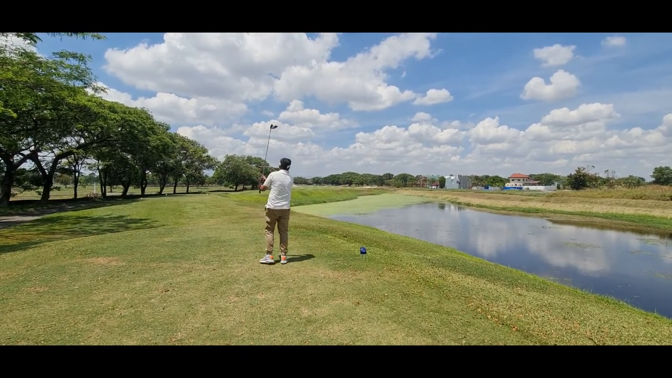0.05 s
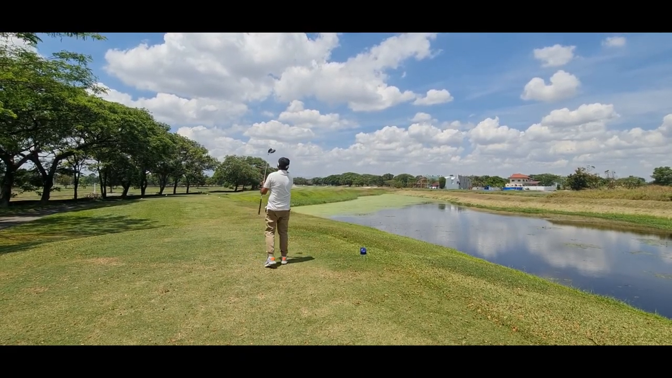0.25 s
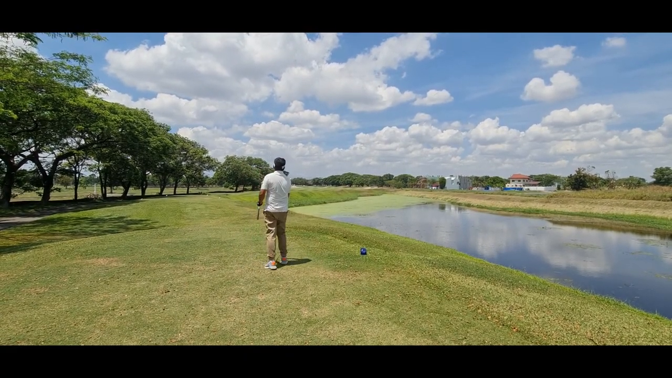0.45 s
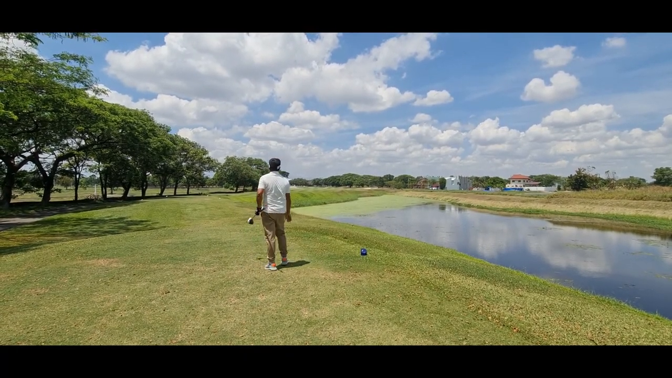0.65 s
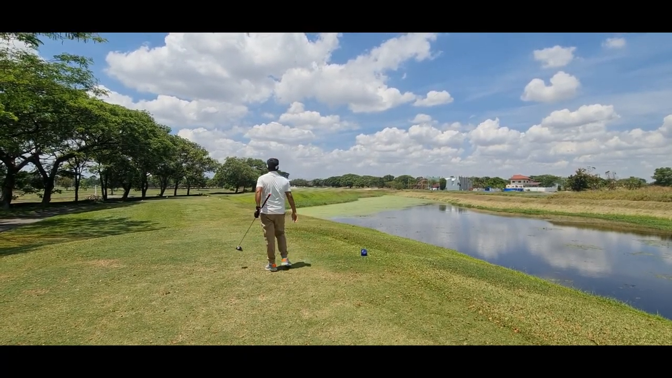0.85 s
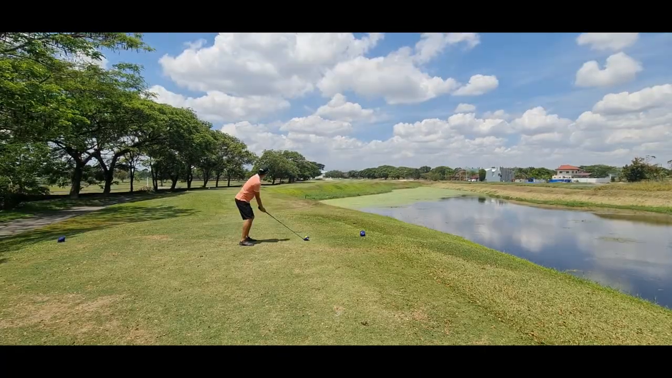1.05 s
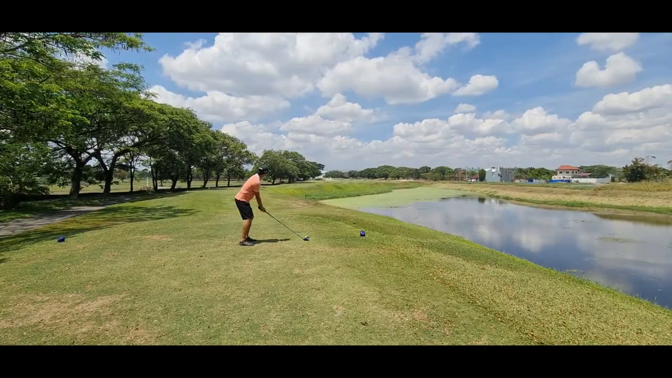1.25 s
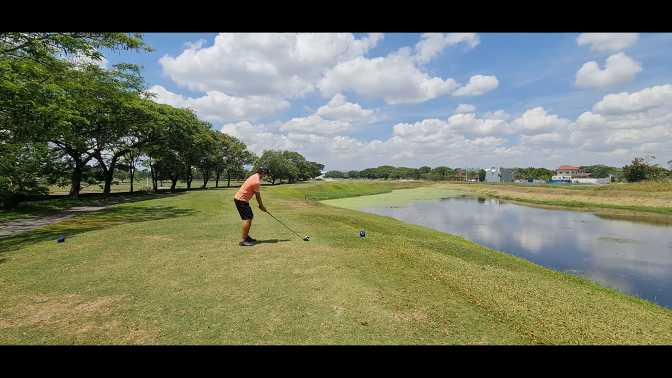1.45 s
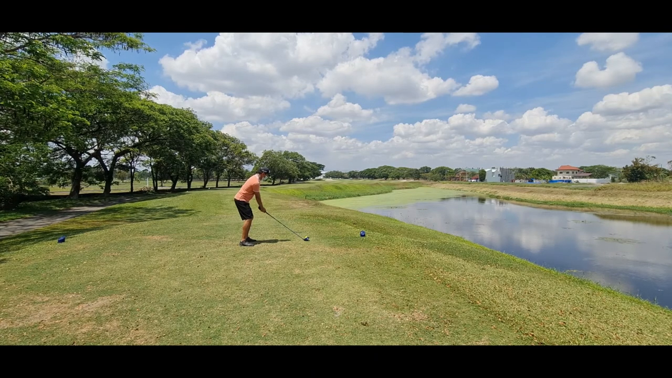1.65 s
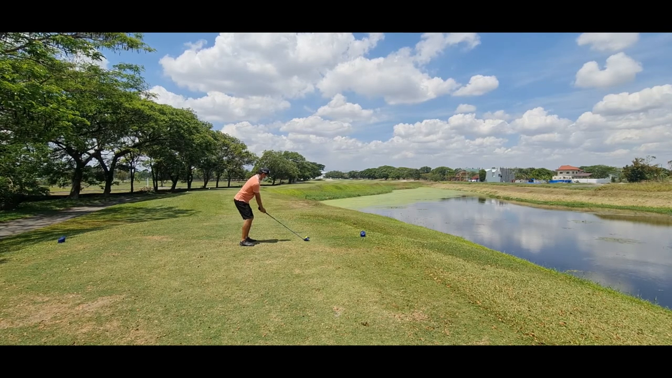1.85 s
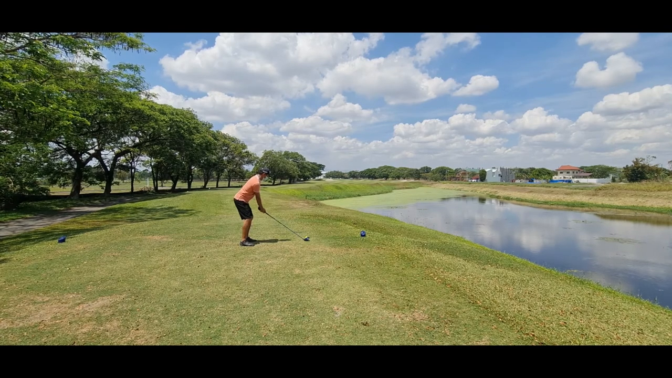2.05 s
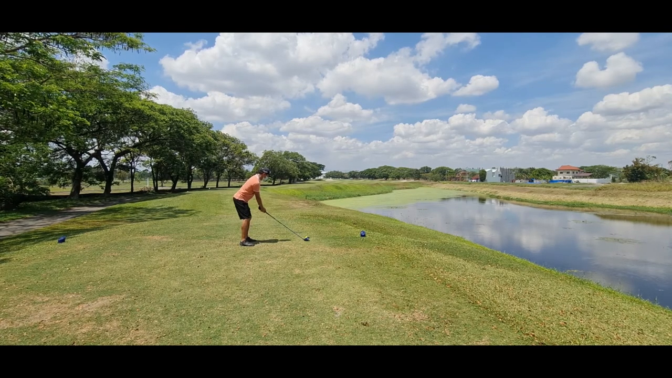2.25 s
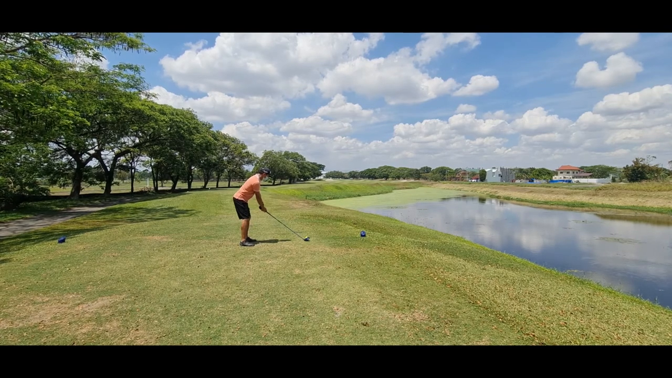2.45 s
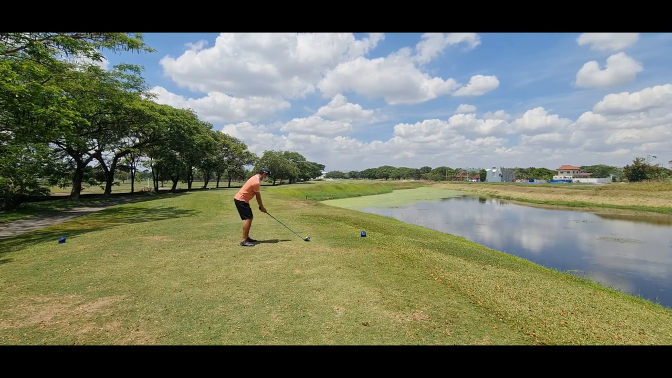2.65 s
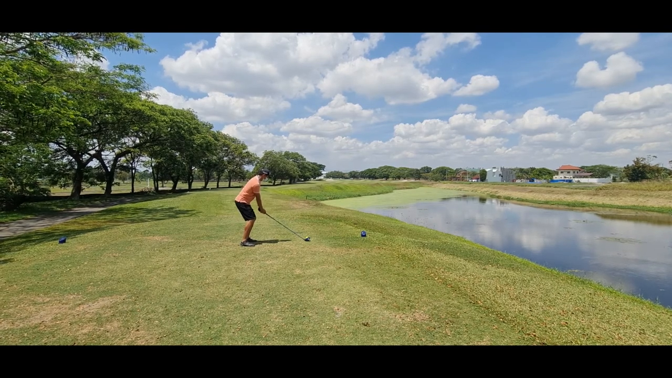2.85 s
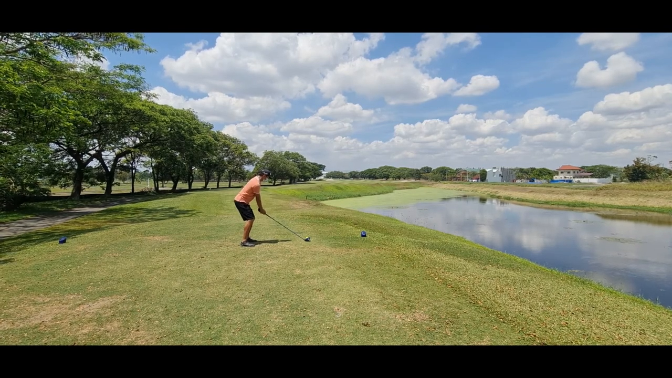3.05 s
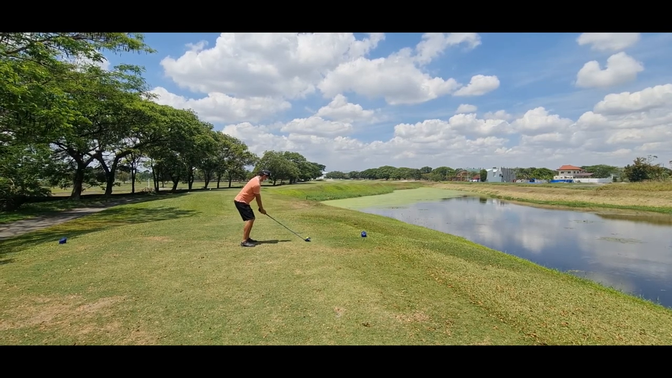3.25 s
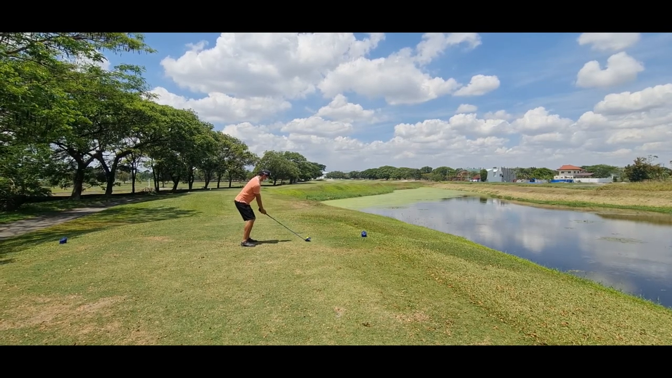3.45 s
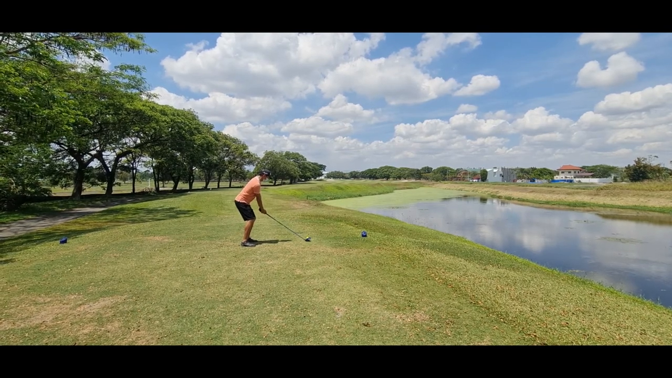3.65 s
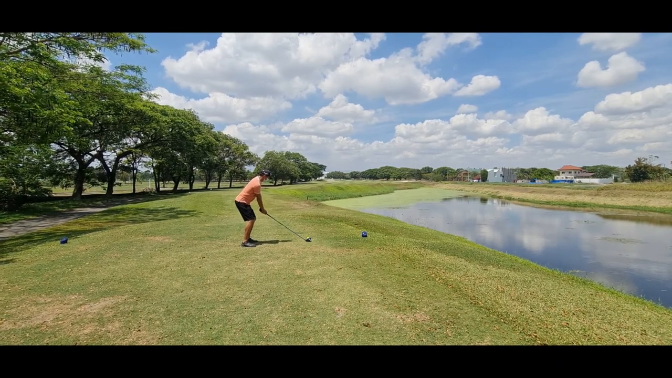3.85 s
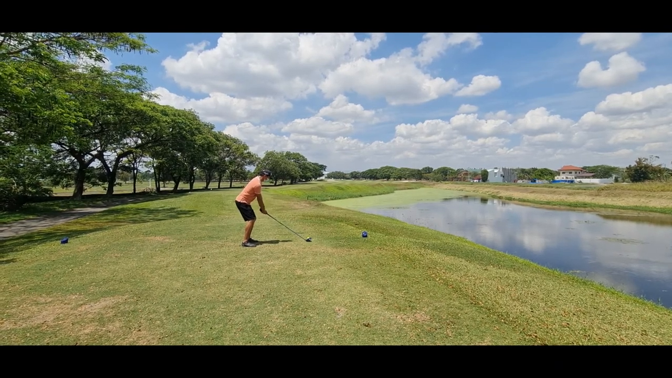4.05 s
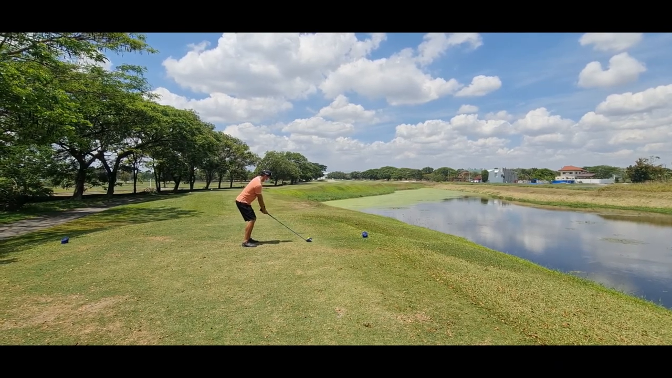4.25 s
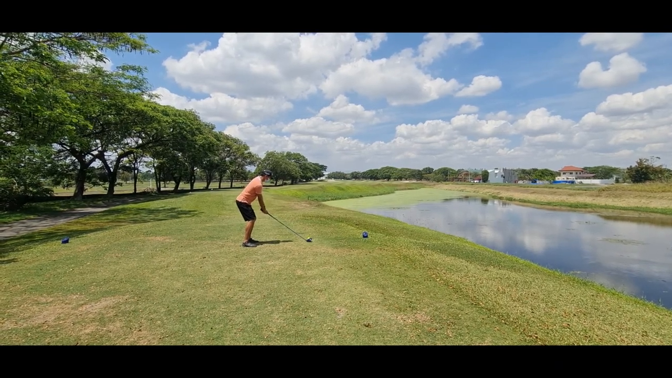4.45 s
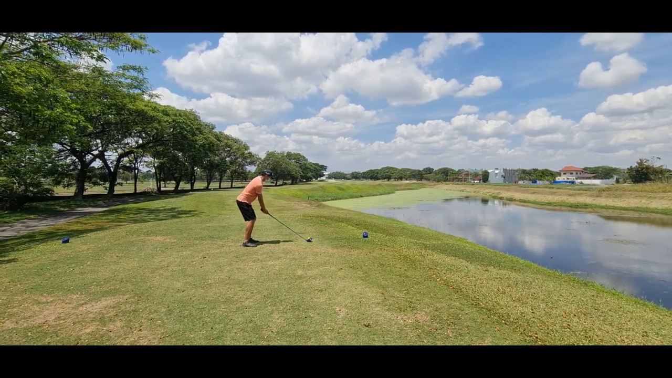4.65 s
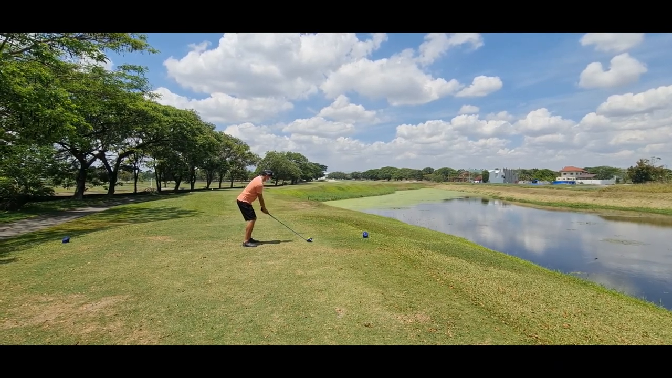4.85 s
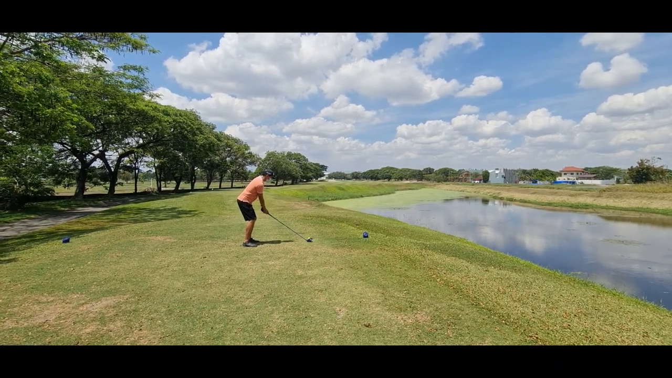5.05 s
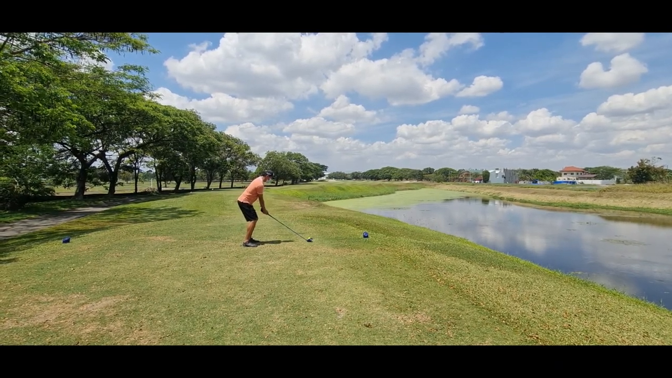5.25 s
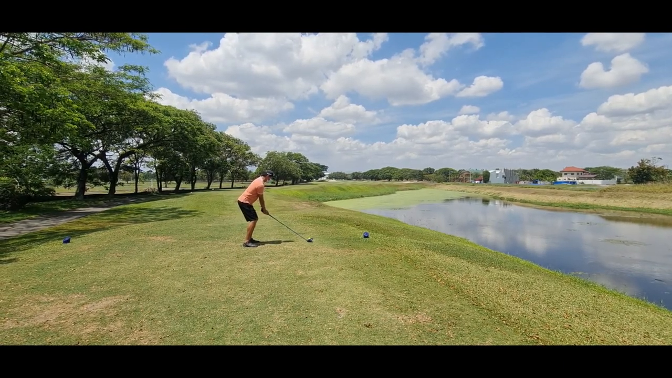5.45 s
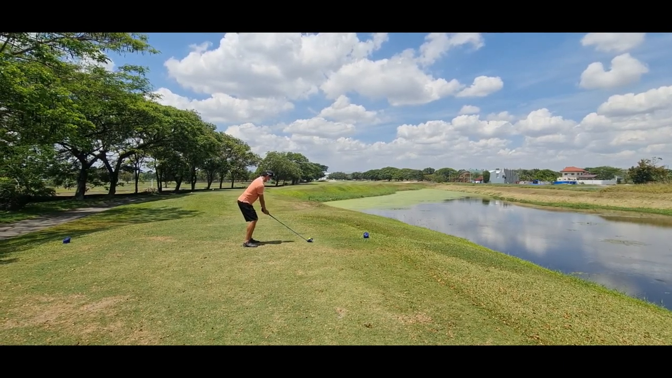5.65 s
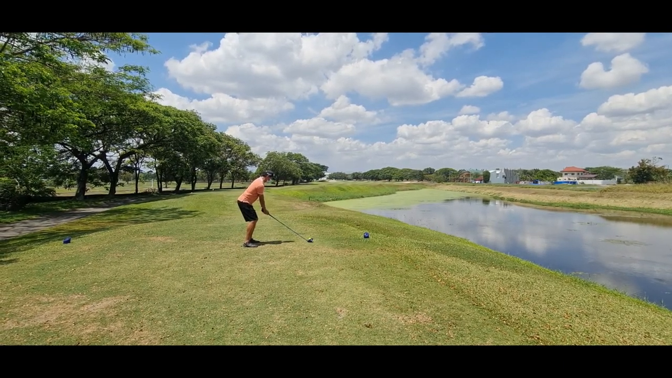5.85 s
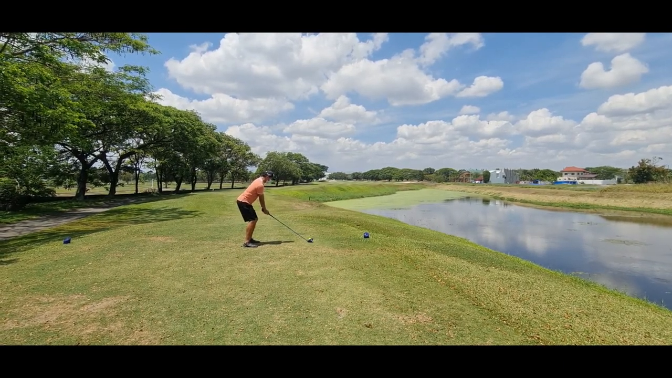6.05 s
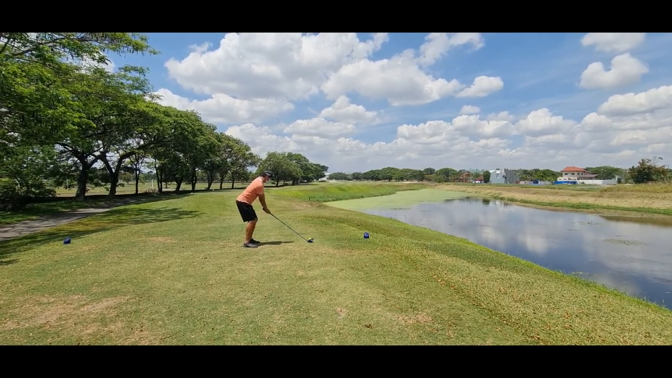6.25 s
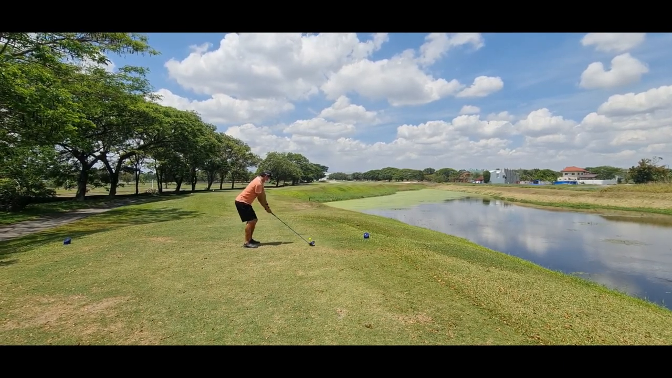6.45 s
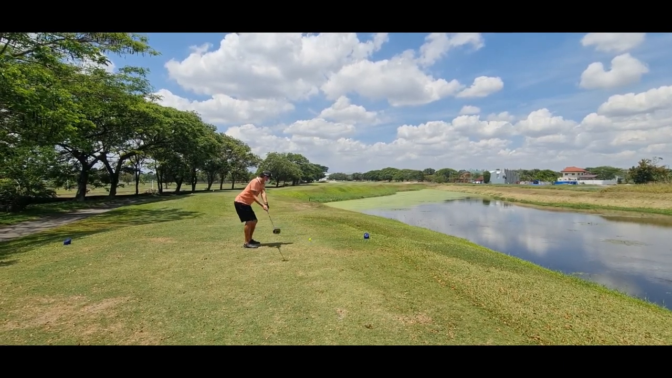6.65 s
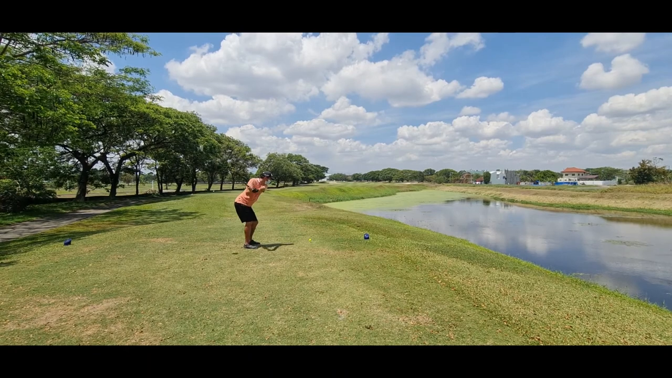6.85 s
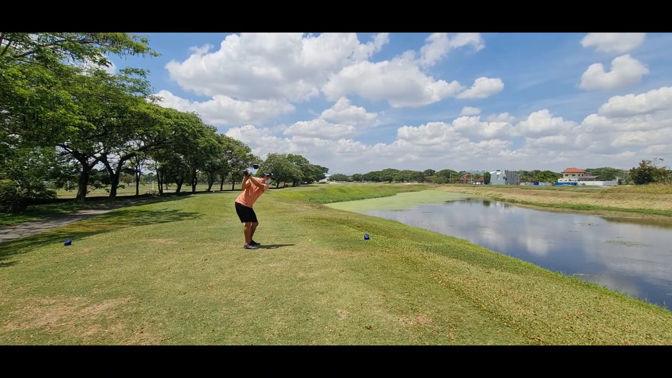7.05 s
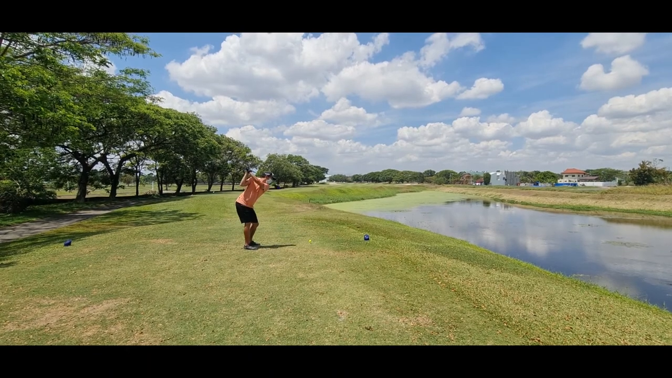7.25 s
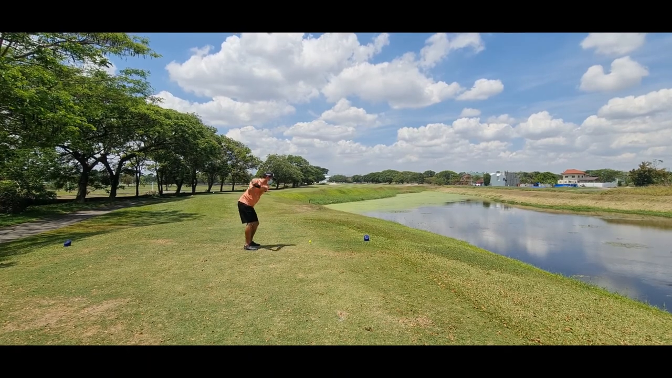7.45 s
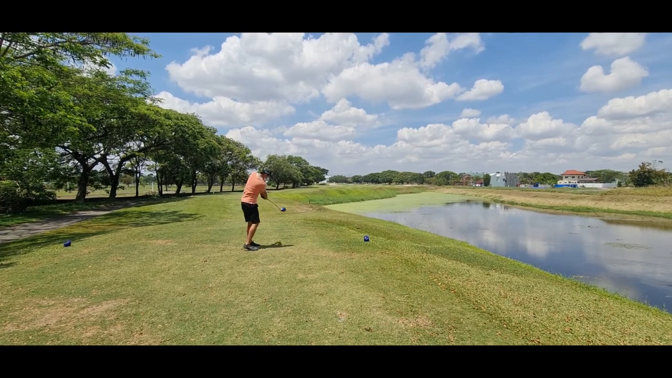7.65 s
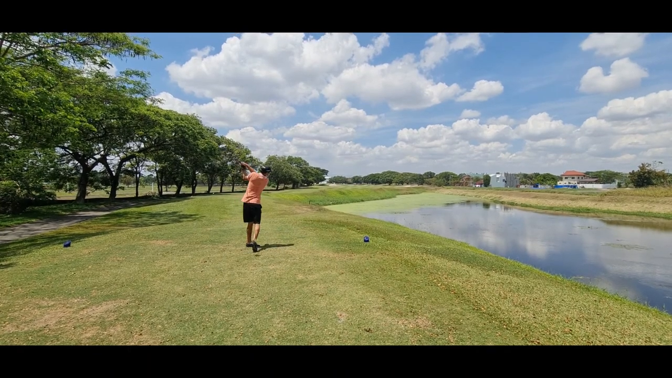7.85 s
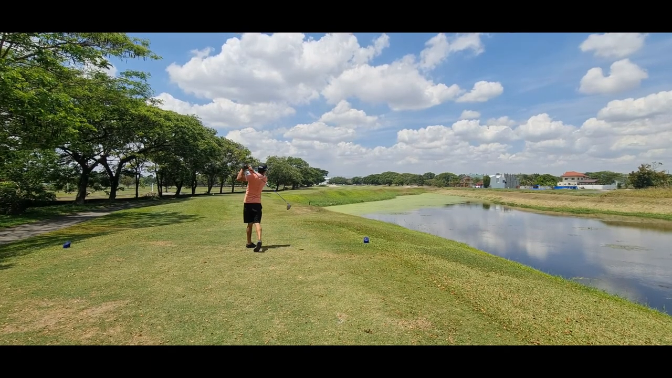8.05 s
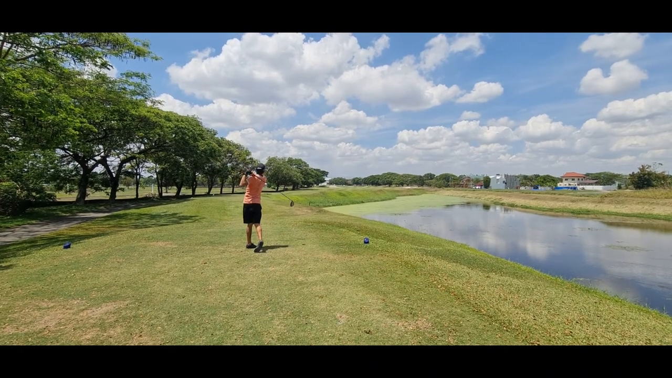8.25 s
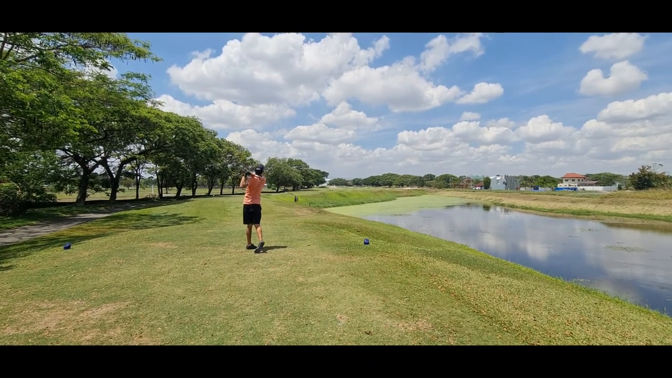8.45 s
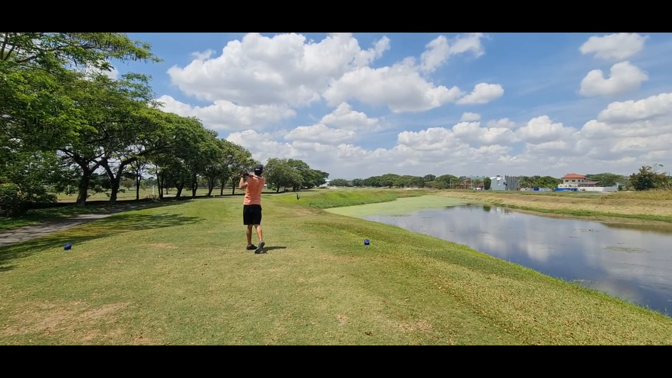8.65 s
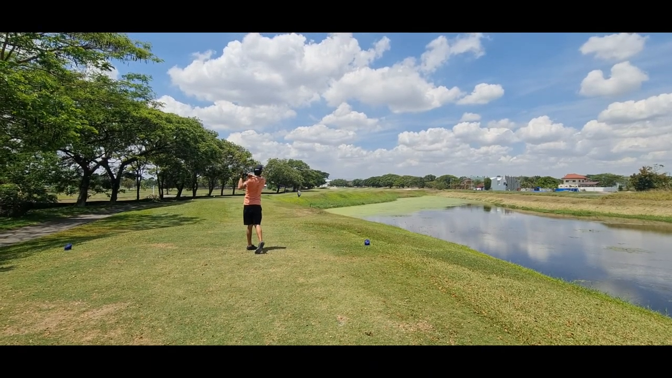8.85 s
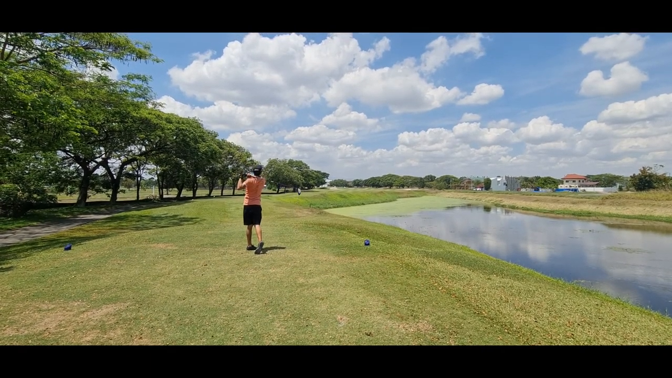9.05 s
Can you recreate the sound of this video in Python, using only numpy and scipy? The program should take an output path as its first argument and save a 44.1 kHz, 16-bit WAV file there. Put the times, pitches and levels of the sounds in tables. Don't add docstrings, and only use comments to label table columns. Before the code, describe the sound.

Outdoors on a golf tee by water and trees, wind thumps softly at the microphone while small birds chirp, whistle and scratch. The sound drops out briefly near one second, then a dry twig snaps. Late on, a fast swish leads into a very loud, sharp driver strike with a short hollow metallic ring; the tree line scatters it back, then wind and birds remain.

```python
import sys
import numpy as np
from scipy import signal
from scipy.fft import rfft, irfft, next_fast_len
from scipy.io import wavfile
from scipy.ndimage import uniform_filter1d, map_coordinates

SR = 44100
rng = np.random.default_rng(int(sys.argv[2]) if len(sys.argv) > 2 else 0)


def output_pcm(signal):
    pcm = np.clip(np.atleast_2d(signal).T, -1, 1) * 32767
    wavfile.write(sys.argv[1], SR, np.round(pcm).astype(np.int16))


def level_to_linear(level):
    exponent = np.asarray(level, float) / 20
    return 10 ** exponent


N = 401310
T = np.arange(N) / SR
BLOW_S = 7.75385
CUT_S = .907, 1.009
# (frequency [Hz], left-right correlation)
ALIKE = [(300, 0.15), (700, -0.6), (1400, -0.56), (2000, -0.27), (3000, 0.61), (8000, 0.044)]


def unit(x):
    return x / np.sqrt(np.mean(x ** 2) + 1e-20)


def along(points, hz):
    f, v = np.transpose(points)
    return np.interp(np.log(hz + 1), np.log(f + 1), v)


def curves(rows):
    s, *cols = np.transpose(rows)
    return [np.interp(T, s, c) for c in cols]


def wobble(rate_hz):
    return map_coordinates(rng.standard_normal(int(N * rate_hz / SR) + 4), [T * rate_hz])


def filtered(x, response):
    m = next_fast_len(x.shape[-1] + 8192)
    return irfft(rfft(x, m) * response(np.fft.rfftfreq(m, 1 / SR)), m)[..., :x.shape[-1]]


def rush(spectrum, alike):
    def shape(hz):
        turn = np.arccos(np.clip(along(alike, hz), -1, 1)) / 2
        return level_to_linear(along(spectrum, hz)) * [np.cos(turn), np.sin(turn)]

    mid, side = filtered(rng.standard_normal((2, N)), shape)
    return unit(np.array([mid + side, mid - side]))


def patchy(x, depth_db):
    z = signal.stft(x, nperseg=1024)[2]
    field = uniform_filter1d(rng.standard_normal(z.shape), size=7, axis=1)
    field = uniform_filter1d(field, size=4, axis=2)
    return unit(signal.istft(z * level_to_linear(depth_db * unit(field)), nperseg=1024)[1][:, :N])


def echo(x, t60_s, colour_db, wait_s):
    hz, t, z = signal.stft(rng.standard_normal((2, SR)), SR, nperseg=256)
    rise = 1 - np.exp(-(t / wait_s) ** 2)
    decay_db = colour_db(hz)[:, None] - 60 * t / t60_s(hz)[:, None]
    tail = signal.istft(z * rise * level_to_linear(decay_db), SR, nperseg=256)[1]
    return signal.fftconvolve(x[None], tail / np.linalg.norm(tail[0]), axes=1)[:, :N]


def air(song):
    # (frequency [Hz], level [dB])
    wash_spectrum = [(290, -32), (500, -19), (645, -8), (795, 2), (1050, -4), (1830, -6.5), (2600, -13.5),
                     (3900, -14), (6960, -19.5), (7550, -23), (8000, -55.5), (10400, -83.5), (17600, -120)]
    # (frequency [Hz], level [dB])
    hiss_spectrum = [(4590, -37.5), (7800, -13), (8320, -9.5), (8860, -1.5), (9620, -3.5), (14200, 0),
                     (15800, -9.5)]
    struck = (T > BLOW_S) * np.exp(-((T - BLOW_S) / 0.33) ** 2)
    wash_db = -68 + 11 * struck
    climb_db = 8 * T * (T < CUT_S[1])
    hiss_db = -91.5 + climb_db + 9.5 * struck + 0.3 * wobble(25)
    song_db = 10 * np.log10(np.abs(uniform_filter1d(song[0] ** 2, size=3000)) + 1e-9)
    opening = np.clip((song_db + 74) / 12, 0, 1)
    wash = level_to_linear(wash_db + 1.3 * wobble(11)) * rush(wash_spectrum, ALIKE)
    treble = filtered(wash, lambda hz: 1 / (1 + (2300 / (hz + 1)) ** 4))
    hiss = level_to_linear(hiss_db + 4.3 * opening) * patchy(rush(hiss_spectrum, [(9000, 0)]), depth_db=4.5)
    return wash + (level_to_linear(3.9 * opening) - 1) * treble + hiss


def wind():
    # (time [s], level [dB], left-right [dB])
    breeze = [(0, -56, 0), (.78, -53, -3.5), (1.05, -54, 1.5), (1.3, -55, -1.5), (1.8, -53.5, 5),
              (2.3, -48, -8), (3.1, -49, -3.5), (3.5, -44, -9), (3.9, -52.5, -7), (4.6, -51, -5),
              (5.2, -44.5, -7.5), (5.4, -46.5, 6.5), (5.8, -55, -8.5), (6.2, -43, -4.5), (6.9, -49, -2.5),
              (7.7, -48, 4.5), (8.1, -55, -1.5), (9.1, -50.5, 1.5)]
    # (time [s], level over the breeze [dB])
    gusts = [(1.04, 9.5), (2.08, 5), (2.25, 5), (2.69, 7.5), (2.82, 5), (3.369, 10), (3.72, -11.5),
             (3.83, 1), (4.161, 15.5), (4.329, 14), (6.97, 10.5), (8.62, -7), (9.07, 8)]
    # (frequency [Hz], density [dB per Hz])
    rumble = [(8.8, -48.5), (15, -12.5), (53, 0), (70, 4), (85, -1), (145, -16.5), (188, -24), (250, -26.5),
              (320, -54.5), (550, -120)]
    # (frequency [Hz], density [dB per Hz])
    rustle = [(76, -35), (130, -4), (188, -7), (247, -7.5), (625, -18), (1000, -30.5), (1300, -59.5),
              (2200, -120)]
    rise_s, fall_s = 0.026, 0.044
    breeze_db, pan_db = curves(breeze)
    puff_db = sum(db * np.exp(-((T - s) / np.where(T < s, rise_s, fall_s)) ** 2) for s, db in gusts)
    sides = level_to_linear(np.array([pan_db, -pan_db]) / 2)
    eddies = np.array([wobble(16), wobble(16)])
    thump = unit(level_to_linear(3.5 * eddies) * rush(rumble, [(60, 0.19)]))
    low = level_to_linear(breeze_db + puff_db + 3.5) * thump
    rustle_db = -60 + 0.37 * (breeze_db - breeze_db.mean()) + 0.21 * puff_db
    high = level_to_linear(rustle_db) * unit(level_to_linear(2.4 * eddies) * rush(rustle, ALIKE))
    return sides * (low + high)


def add_note(song, s, hz, db):
    pan, lag = rng.standard_normal(2)
    phase = 2 * np.pi * np.cumsum(hz) / SR + [[0], [1.35 + .5 * lag]]
    level = level_to_linear(db + 4.5 + 0.5 * pan * np.array([[1], [-1]]))
    song[:, round(s * SR):][:, :len(hz)] += level * np.sin(phase)


def far_piper(song):
    # (time [s], length [s], first pitch [Hz], level [dB])
    coos = [
        (5.874, 0.082, 1578, -77.5),
        (6.117, .57, 1764, -79.5),
        (6.747, 0.363, 1582, -77.5),
    ]
    sag_hz_per_s, edge_s = 77, .02
    waver_db = 1.5 * wobble(9)
    for s, length_s, first_hz, db in coos:
        t = np.arange(1, round(length_s * SR)) / SR
        edges = np.clip(np.minimum(t, length_s - t) / edge_s, .01, 1)
        level_db = db + waver_db[round(s * SR):][:len(t)] + 20 * np.log10(edges)
        add_note(song, s, first_hz - sag_hz_per_s * t, level_db)


def chips(song):
    # (time [s], length [s], centre [Hz], level [dB])
    scratches = [(0.32, 0.028, 4920, -61.5), (0.413, 0.027, 6100, -65.5), (0.567, 0.028, 5400, -67),
                 (0.658, 0.016, 5450, -66), (1.705, 0.14, 4870, -68.5), (1.91, 0.019, 5500, -64),
                 (2.959, 0.027, 6850, -63), (3.243, 0.033, 2830, -63), (3.818, 0.038, 5460, -73),
                 (4.303, 0.056, 6500, -71), (5.95, 0.023, 5830, -74), (6.047, 0.023, 3280, -65.5),
                 (6.372, .02, 4020, -72), (6.52, 0.063, 3800, -69), (7.196, 0.06, 3250, -62.5),
                 (8.418, 0.04, 4430, -58.5), (8.54, 0.028, 4560, -60.5), (1.503, 0.043, 6300, -65.5),
                 (4.184, 0.018, 2700, -68)]
    for s, length_s, centre_hz, db in scratches:
        t = np.arange(round(length_s * 2 * SR)) / SR
        rasp = filtered(rng.standard_normal((2, len(t))), lambda hz: np.exp(-((hz - centre_hz) / 1100) ** 2))
        swell = np.minimum(t / 0.0081, 1) * np.exp(-(t / length_s) ** 2)
        song[:, round(s * SR):][:, :len(t)] += level_to_linear(db) * unit(rasp) * swell


def whistles(song, flutter):
    # (time [s], length [s], top [Hz], share lower at both ends, level [dB])
    arched = [(0.218, .026, 3570, .06, -65), (0.432, 0.03, 4830, .05, -68),
              (1.022, 0.022, 2470, 0.045, -67), (1.186, .027, 4400, 0.042, -66),
              (3.243, 0.04, 2095, .03, -67), (4.703, 0.053, 2375, .09, -68.5),
              (5.056, .06, 2157, 0.038, -60.5), (5.178, 0.031, 4060, 0.17, -63),
              (5.647, 0.098, 4530, .04, -76), (6.134, 0.044, 2940, .04, -62),
              (6.378, .022, 4200, 0.057, -51.5), (6.386, 0.049, 1746, .03, -64.5),
              (6.903, 0.065, 2900, .2, -60.5), (7.248, .029, 4240, 0.11, -71),
              (7.407, 0.064, 2310, 0.05, -70), (7.525, 0.045, 3900, .03, -63.5)]
    # (time [s], length [s], last pitch [Hz], share it climbs, level [dB])
    sliding = [(0.307, 0.045, 2860, 0.011, -65), (9.057, 0.038, 1460, 0.22, -63),
               (3.821, 0.039, 1690, 0.31, -71), (1.195, .029, 3860, 0.19, -64),
               (1.257, 0.032, 2390, 0.08, -61), (1.281, .022, 2855, .1, -61),
               (1.285, 0.031, 2335, -0.074, -70), (1.326, .026, 3900, 0.17, -62),
               (3.903, .07, 1250, -.28, -72.5), (2.396, 0.033, 4550, .1, -68),
               (2.481, 0.11, 4520, -0.00099, -64), (4.186, .075, 1997, 0.04, -64),
               (4.918, 0.03, 4220, 0.056, -61), (4.94, 0.031, 3180, -.05, -66),
               (5.08, 0.014, 5700, .25, -73), (5.112, .015, 5530, -.15, -76), (5.177, 0.01, 6400, .14, -70),
               (6.372, 0.0153, 4220, 0.24, -62), (7.161, 0.042, 2824, .03, -58.5),
               (7.213, 0.039, 2940, 0.15, -63.5)]
    # (time [s], length [s], pitch [Hz], level [dB])
    peeps = [(.06, 0.036, 5400, -69), (0.147, 0.12, 3280, -73.5), (0.46, 0.099, 4170, -71.5),
             (0.809, .02, 5350, -64), (1.08, .03, 5150, -73), (1.126, .02, 5900, -69),
             (1.186, .021, 2250, -66), (1.196, .035, 3730, -68), (1.323, 0.0088, 6000, -68),
             (1.48, .023, 6650, -69), (3.244, 0.049, 2690, -58), (3.261, 0.044, 4990, -69),
             (3.28, 0.056, 5430, -73), (4.102, 0.081, 1950, -67.5), (5.022, 0.036, 2030, -70),
             (5.173, .0085, 4300, -63), (6.357, .023, 4550, -67), (7.155, .055, 1950, -63),
             (8.789, 0.084, 4030, -71.5)]
    early = .75
    notes = [(s, n, hz * (1 - d), hz, hz * (1 - d), db) for s, n, hz, d, db in arched]
    notes += [(s, n, hz * (1 - d), hz * (1 - d * (1 - early)), hz, db) for s, n, hz, d, db in sliding]
    notes += [(s, n, hz, hz, hz, db) for s, n, hz, db in peeps]
    for s, length_s, first_hz, middle_hz, last_hz, db in notes:
        u = np.arange(1, round(length_s * SR)) / (length_s * SR)
        bend = np.polyfit([0, .5, 1], [first_hz, middle_hz, last_hz], 2)
        hz = np.polyval(bend, u) * flutter[round(s * SR):][:len(u)] ** .4
        swell_db = np.minimum(0, 22 * np.log10(1.4 * np.sin(np.pi * u ** 0.32)))
        add_note(song, s, hz, db + swell_db)


def repeated_calls(song, flutter):
    # (time from peak [s], pitch [Hz], level [dB])
    chirp = [(-.078, 4150, -16), (-.066, 4400, -7), (-.054, 4250, -22), (-.042, 3450, -3),
             (-.027, 3350, -22), (-.016, 2980, -3), (0, 3900, -1), (.008, 3500, -7), (.018, 3050, -16)]
    # (time [s], level [dB])
    sparrow = [(0.126, -62.5), (0.851, -59.5), (1.151, -61), (1.78, -60.5), (2.56, -58.5), (3.401, -60.5),
               (4.127, -61), (4.844, -61.5), (5.551, -62), (6.841, -61.5), (7.526, -56), (8.319, -61),
               (8.909, -62)]
    # (time [s], pitch [Hz], level [dB])
    falling = [(0, 7800, -10), (.015, 7200, 0), (.04, 6250, -2), (.08, 5250, -7), (.13, 4300, -12)]
    # (time [s], level [dB])
    whistler = [(.012, -68), (1.51, -70), (1.739, -69.5), (2.963, -70), (4.32, -69.5), (6.049, -73),
                (7.576, -64.5)]
    for shape, calls, upper_db, rough in (chirp, sparrow, -7, 1.1), (falling, whistler, -30, .6):
        at, pitch, level = np.transpose(shape)
        t = np.arange(at[0], at[-1], 1 / SR)
        for peak_s, db in calls:
            s = peak_s + at[0]
            hz = np.interp(t, at, pitch) * flutter[round(s * SR):][:len(t)] ** rough
            swell_db = db + np.interp(t, at, level + rng.normal(0, 1.6, len(at)))
            swell_db = swell_db - 40 * np.exp(-(t - at[0]) / .002)
            add_note(song, s, hz, swell_db)
            add_note(song, s, hz * rng.uniform(1.18, 1.5), swell_db + upper_db - 70 * (t - at[0]))


def birds():
    song = np.zeros((2, N + SR))
    flutter = 1 + .035 * wobble(320)
    far_piper(song)
    chips(song)
    whistles(song, flutter)
    repeated_calls(song, flutter)
    song = song[:, :N] * level_to_linear(3.6 * wobble(150))
    leaves = echo(song[0], lambda hz: 0.18 + 0 * hz, lambda hz: 0 * hz, wait_s=0.0054)
    return 0.87 * song + level_to_linear(-4.5) * leaves


def twig():
    # (time [s], peak level [dB])
    snap = [
        (1.2733, -49.5),
    ]
    (s, db), = snap
    t = np.clip(T - s - .0015, 0, .05)
    dull = filtered(rng.standard_normal(N), lambda hz: 1 / (1 + (hz / 7500) ** 4))
    return level_to_linear(db + 11 - 60 * t / 0.0077) * (t > 0) * (np.sin(2 * np.pi * 3300 * t) + 0.29 * dull)


def swing():
    # (time [s], shaft level [dB], head level [dB])
    swish = [
        (7.6, -71, -80.5),
        (7.68, -57.5, -73),
        (7.73, -50, -57),
        (7.752, -49, -51),
        (7.77, -56.5, -67),
        (7.85, -95, -92.5),
    ]
    shaft_db, head_db = curves(swish)
    shaft = rush([(200, -37), (500, 1), (900, -5.5), (1600, -11.5), (3000, -28), (9000, -75.5)], [(900, .4)])
    head = rush([(1000, -40.5), (3000, -5.5), (4200, 0.5), (6200, -6.0), (8000, -6.5), (16000, -28)],
                [(900, .2)])
    moving = (T > swish[0][0]) * (T < swish[-1][0])
    return (level_to_linear(shaft_db) * shaft + level_to_linear(head_db) * head) * moving


def ring(modes, attack_s, shake_db):
    start = round(BLOW_S * SR)
    span = slice(start, start + SR // 2)
    t = T[span] - T[start]
    out = np.zeros(N)
    for hz, db, t60_s in modes:
        shake = map_coordinates(rng.standard_normal(size=50), [90 * t])
        out[span] += level_to_linear(db - 60 * t / t60_s + shake_db * shake) * np.sin(2 * np.pi * hz * t)
    out[span] *= 1 - np.exp(-(t / attack_s) ** 2)
    return out


def tree_line(head):
    # (frequency [Hz], t60 [s])
    decay = [(300, 0.99), (1500, 0.44), (4500, 0.67), (7000, 0.66), (12000, 0.56)]
    # (frequency [Hz], level [dB])
    answer = [(200, -14.5), (800, -10.5), (2500, -8), (3400, -17.5), (4000, -12), (4550, -1.5),
              (5300, -11.5), (6500, -0.5), (7600, -13), (9500, -17), (12000, -17.5), (16000, -26)]
    # (time after the blow [s], level [dB])
    trunks = [(.047, 0.5), (.07, 3.5), (.11, 0), (0.171, 2), (.26, 1.5), (.34, 4.5)]
    kick = np.zeros(N)
    kick[round(BLOW_S * SR)] = 1
    trees = echo(kick + .04 * head, lambda hz: along(decay, hz), lambda hz: along(answer, hz), wait_s=0.02)
    after = np.clip(T - BLOW_S, 0, 1)
    returns_db = sum(db * np.exp(-((after - s) / 0.013) ** 2) for s, db in trunks)
    return level_to_linear(-4.0 + returns_db) * trees


def strike():
    # (frequency [Hz], level [dB], t60 [s])
    head_modes = [(2440, -33, .07), (3875, -12, .12), (4156, -2.5, .115), (4250, -12, .1), (4388, -10, .09),
                  (4550, -21, .12), (5300, -22, .07), (5788, -1.5, .045), (6000, -18, .07),
                  (6245, -13, .055), (6435, -11, .036), (6810, -21, .05), (7020, -25, .07),
                  (7890, -13, .032), (9030, -28, .055), (11440, -30, .07), (13200, -40, .08)]
    # (frequency [Hz], level [dB], t60 [s])
    ball_modes = [(210, -24.5, 0.066), (372, -11, 0.027), (628, -14, 0.014), (925, -6.5, 0.018),
                  (1695, -8, 0.018), (2564, -16, 0.003), (4323, -8, 0.021), (5700, -1.5, 0.014),
                  (7787, -8.5, 0.026)]
    # (frequency [Hz], lead [rad])
    port_lead = [(400, 0), (1700, .4), (4200, .85), (5800, 1.9), (6300, 2.2), (7900, 4.2), (11000, 4)]
    # (frequency [Hz], left-right [dB])
    port_tilt = [(400, -2.5), (900, 5), (1700, 1), (4200, -3), (6200, -4.5), (7900, 6.5), (11000, 2.5)]
    squash = np.clip((T - BLOW_S - .0005) / .00016, -9, 9)
    rebound = (1 - squash ** 2) * np.exp(-squash ** 2 / 2)
    pop = level_to_linear(-7.0) * ring(ball_modes, attack_s=0.0014, shake_db=4.5) - level_to_linear(-3.0) * rebound
    head = level_to_linear(-10) * ring(head_modes, attack_s=0.0012, shake_db=2.5)

    def ports(hz):
        half = level_to_linear(along(port_tilt, hz) / 2) * np.exp(.5j * along(port_lead, hz))
        return half ** np.array([[1], [-1]])

    direct = filtered(np.tile(pop + head, (2, 1)), ports)
    after = np.clip(T - BLOW_S, 0, 1)
    burst = rush([(300, -8.5), (1000, 0), (3300, -2.5), (7500, -0.5), (16000, -11)], [(900, 0.1)])
    crack = level_to_linear(-22 - 60 * after / 0.045) * (T > BLOW_S + .0003) * burst * level_to_linear([[1.5], [-1.5]])
    smear = [(300, -13.0), (900, -6.5), (2500, -19.5), (4200, -4.5), (5000, -14.5), (6100, 0.5),
             (7500, -18.5), (16000, -24)]
    ahead = level_to_linear(-35) * (T > BLOW_S - .008) * (T < BLOW_S) * rush(smear, [(900, 0.38)])
    return direct + crack + ahead + tree_line(head)


def scene():
    song = birds()
    return air(song) + wind() + song + twig() + swing() + strike()


def low_pass(x):
    return signal.sosfilt(signal.butter(12, 16480, fs=SR, output="sos"), x)


def record(dry):
    gate = np.clip(np.maximum(CUT_S[0] - T, T - CUT_S[1]) / 0.0017, 0, 1)
    mix = filtered(dry * gate, lambda hz: np.clip((15850 - hz) / 300, 0, 1))
    return low_pass(mix)


dry = scene()
out = record(dry)
output_pcm(out)
```